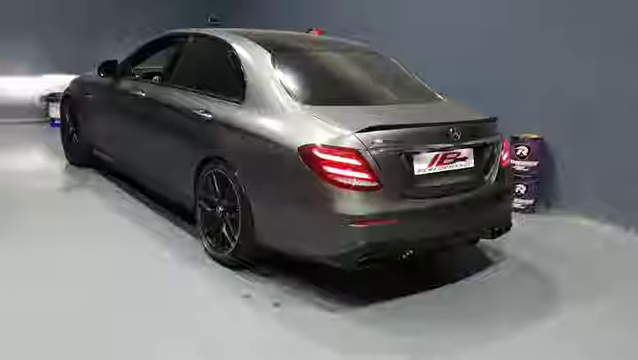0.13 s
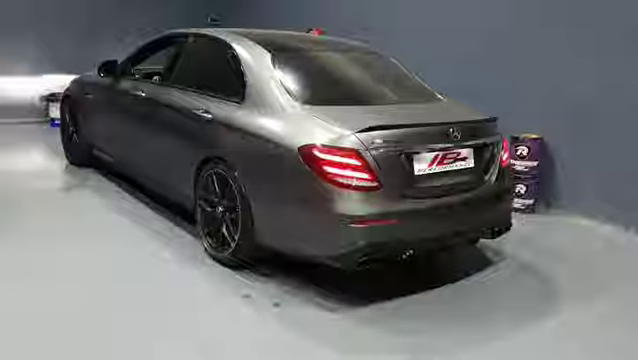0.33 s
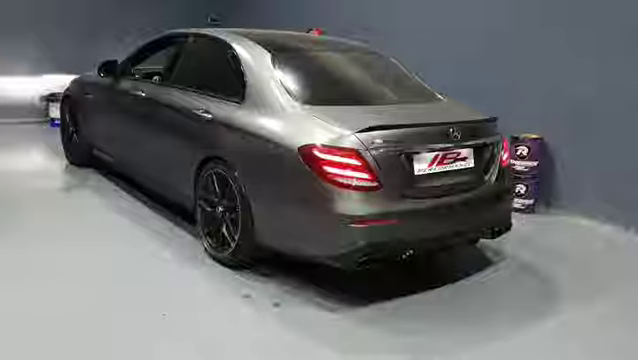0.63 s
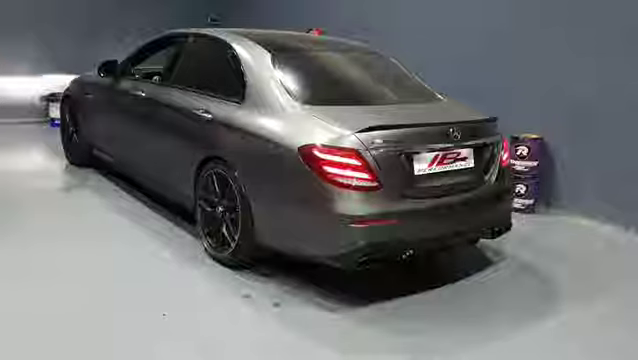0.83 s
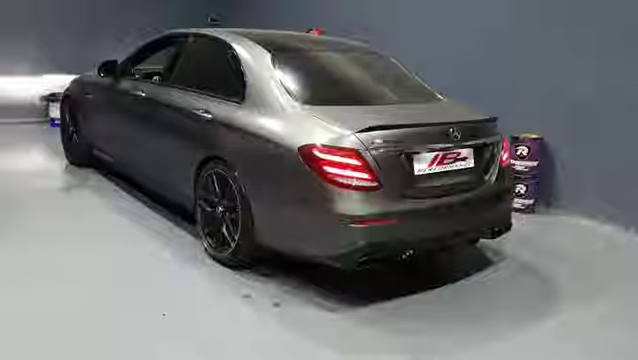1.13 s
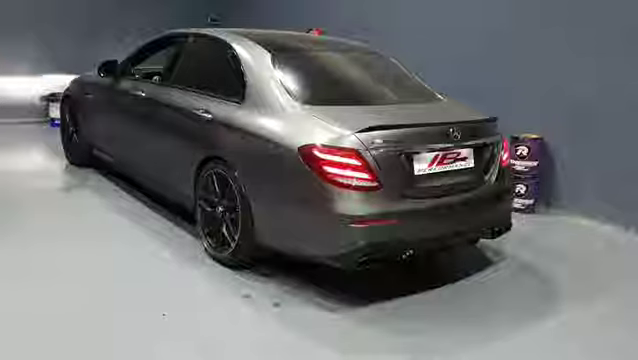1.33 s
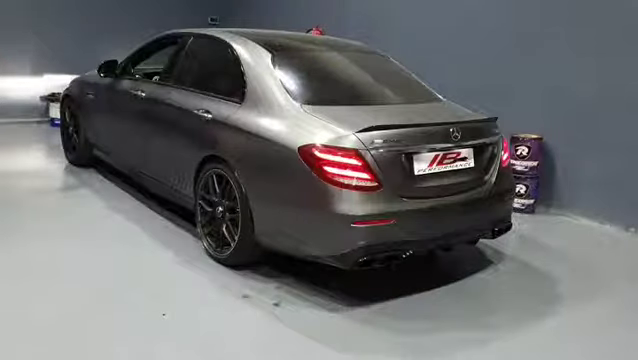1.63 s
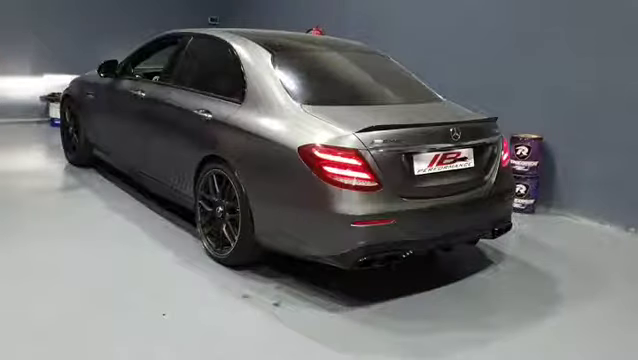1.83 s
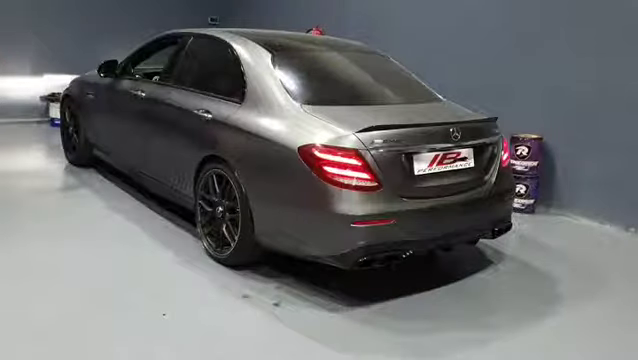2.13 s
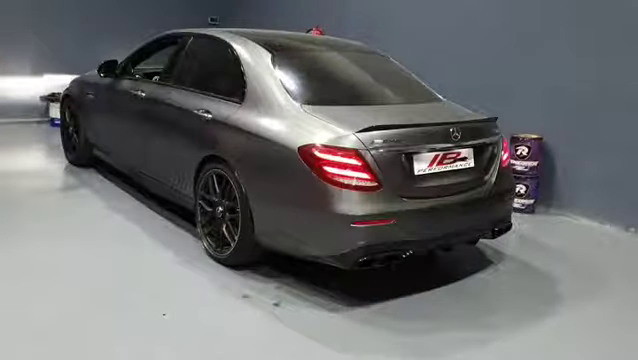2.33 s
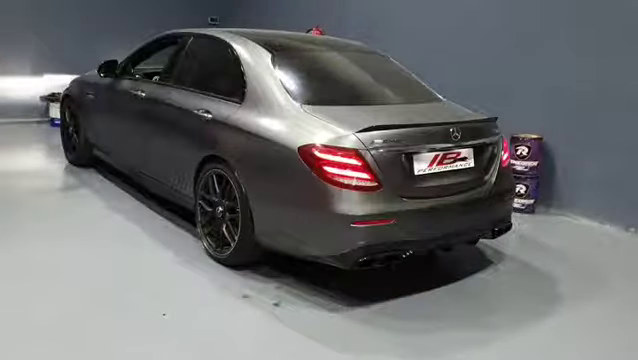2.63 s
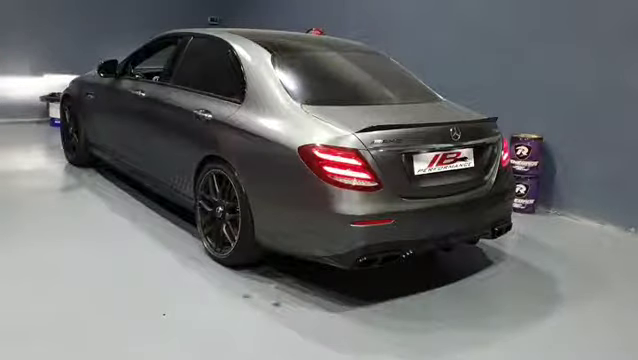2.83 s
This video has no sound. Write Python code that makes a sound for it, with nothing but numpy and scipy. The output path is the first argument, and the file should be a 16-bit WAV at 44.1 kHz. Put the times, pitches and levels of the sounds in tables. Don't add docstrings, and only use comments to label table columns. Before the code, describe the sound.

A car's eight-cylinder engine, heard from behind in a hard-walled garage. After brief silence it starts abruptly at 0.2 s, revs sinking to a soft, low idle by 1.2 s. Around 1.4 s the throttle opens with a thump and faint hiss; a raspy roar climbs to a peak near 1.9 s. From 2.1 to 2.5 s irregular pops crack and echo while the drone falls and fades. Small, slightly squashed microphone sound.

```python
import sys
import numpy as np
from scipy import signal
from scipy.fft import rfft, irfft, next_fast_len
from scipy.io import wavfile
from scipy.ndimage import uniform_filter1d, map_coordinates

SR = 44100
rng = np.random.default_rng(int(sys.argv[2]) if len(sys.argv) > 2 else 0)


def generate_wav(signal):
    frames = np.transpose(np.atleast_2d(signal))
    scaled = np.clip(frames, -1, 1) * 32767
    pcm = np.round(scaled).astype(np.int16)
    wavfile.write(sys.argv[1], SR, pcm)


def elevation(decibels):
    levels = np.asarray(decibels, float)
    return 10 ** (levels / 20)


N = 132300

# centre in Hz, width in Hz, level in dB.
ROOM_MODES = [(45, 8, 0), (60, 6, 6), (68.5, 5, 14), (80, 6, 8), (200, 10, 0), (321, 5, 0), (570, 8, 2)]
# centre in Hz, width in Hz, level in dB.
PIPE_MODES = [(327.3, 16.6, 3), (609, 75, 9.5), (893, 22, -15), (1142, 112, -11), (1480, 94, -12),
              (1604, 3.7, -17), (2654, 480, -15), (3500, 9.3, -12), (3590, 92, -11), (6360, 130, -28)]


def unit(x):
    return x / np.sqrt(np.mean(x ** 2) + 1e-20)


def along(points, hz):
    f, v = np.transpose(points)
    return np.interp(np.log(hz + 1), np.log(f + 1), v)


def curves(rows):
    s, *columns = np.transpose(rows)
    return [np.interp(np.arange(N) / SR, s, column) for column in columns]


def wobble(rate_hz):
    return map_coordinates(rng.standard_normal(400), [np.arange(N) * rate_hz / SR])


def filtered(x, response):
    m = next_fast_len(N + SR)
    return irfft(rfft(x, m) * response(np.fft.rfftfreq(m, 1 / SR)), m)[..., :N]


def ringing(peaks, f, flip=-1):
    total = 0
    for k, (centre, width, db) in enumerate(peaks):
        damping = 1j * f * abs(width)
        total = total + flip ** k * elevation(db) * damping / (centre * centre - f * f + damping)
    return total


def spread(pair, colour):
    # frequency in Hz, left-right likeness from 0 to 1.
    likeness = [(60, 1), (250, 0.96), (500, 0.87), (1000, 0.65), (2000, 0.47), (4000, 0.2), (8000, 0.16)]

    def mid_and_side(hz):
        turn = np.arccos(np.clip(along(likeness, hz), -1, 1)) / 2
        return colour(hz) * [np.cos(turn), np.sin(turn)]

    mid, side = filtered(pair, mid_and_side)
    return unit(np.array([mid + side, mid - side]))


def garage(x):
    # frequency in Hz, reverberation time t60 in seconds.
    decay_times = [(100, 0.98), (800, 0.21), (2000, 1.29), (5500, 1.6), (10000, 1.22), (14000, 0.31)]
    noise = rng.standard_normal((2, SR + SR // 2))
    hz, t, z = signal.stft(noise, SR, nperseg=256)
    decay = elevation(-60 * t / along(decay_times, hz)[:, None])
    tail = signal.istft(z * decay, SR, nperseg=256)[1]
    tail = np.pad(tail, ((0, 0), (400, N - 400 - tail.shape[1])))
    tail = spread(tail, np.ones_like) / np.sqrt(N)
    return signal.fftconvolve(x[None], tail, axes=1)[:, :N]


def intake():
    # start, attack, swell and release in seconds, level in dB.
    throttle_snap = (1.29, .025, .2, .27, -40)
    # frequency in Hz, level in dB per Hz.
    air_spectrum = [(6000, -30), (9500, -14), (10500, -24), (11400, 0), (13000, -1), (15400, -4),
                    (16000, -30)]
    start, attack, swell, release, db = throttle_snap
    opened = start + attack
    full = opened + swell
    gain, = curves([(start, 0), (opened, .11), (full, 1), (full + release, 0)])
    hiss = spread(rng.standard_normal((2, N)), lambda f: elevation(along(air_spectrum, f)))
    return elevation(db) * gain * hiss


def pops():
    # start in seconds, crack in dB, thud in dB, upper limit of the crack in Hz.
    pop_events = [(2.138, -10, -8, 3300), (2.184, -21.5, -2.5, 4140), (2.188, -10.5, -6, 4200),
                  (2.197, -22, -15, 4170), (2.212, -30, -6, 3970), (2.245, -4.5, -8, 3960),
                  (2.248, -2.5, -20, 4150), (2.2496, -15.5, -35, 18000), (2.259, -6.5, -10, 4000),
                  (2.261, -18, -30, 18000), (2.263, -12, -12, 4500), (2.274, -21, -13, 4200),
                  (2.356, -56, -5.5, 3000), (2.379, -1.5, -29, 15700), (2.387, -16, -24, 4500),
                  (2.398, -18, -37, 4500), (2.41, -35, -8, 4960), (2.435, -24, -28, 9000),
                  (2.462, -20.5, -16, 4520)]
    # frequency in Hz, level in dB per Hz.
    crack_spectrum = [(900, -26), (1500, -5), (1780, -15), (2300, -8), (3700, -5.5), (4670, -15),
                      (6200, -11.5), (10400, -24.5), (16000, -23.5)]
    # start in seconds, level in dB,
    # frequency in Hz, t60 in seconds.
    pressure_waves = [
        (1.405, -6.5, 65, 0.21),
        (1.476, -4.5, 67.6, 0.17),
        (2.067, -15.5, 73, 0.22),
        (2.176, -12, 70.6, 0.35),
        (2.2498, -6.5, 65.4, 0.21),
    ]
    cracks, thuds = np.zeros(N), np.zeros(N)
    t = np.arange(SR // 2) / SR
    crack_decay = elevation(-60 * t / 0.022) + 0.22 * elevation(-60 * t / 0.072)
    for s, crack_db, thud_db, top_hz in pop_events:
        burst = rng.standard_normal((2, len(t)))
        dull = signal.lfilter(*signal.butter(2, min(top_hz / SR * 2, .9)), burst[0])
        cracks[round(s * SR):][:len(t)] += elevation(crack_db) * crack_decay * dull
        thuds[round(s * SR):][:len(t)] += elevation(thud_db - 60 * t / 0.019) * burst[1]
    crack = elevation(7.5) * filtered(cracks, lambda f: elevation(along(crack_spectrum, f)) * (f > 900))
    thud = elevation(11.5) * filtered(thuds, lambda f: ringing(PIPE_MODES[:3], f) / (1 + (f / 1300) ** 4))
    walls = garage(elevation(1.3) * crack + elevation(-7.0) * thud)
    for s, db, hz, t60 in pressure_waves:
        onset = 1 - np.exp(-t / 0.0055)
        thud[round(s * SR):][:len(t)] += elevation(db - 60 * t / t60) * np.sin(2 * np.pi * hz * t) * onset
    return crack * elevation([[-2.5], [1.5]]) + thud + walls


def exhaust_gas(puff, share):
    return (1 - share + share * unit(puff)) * rng.standard_normal((2, N))


def pipe_gain(f):
    level_peaks = [(centre, width, 0) for centre, width, db in PIPE_MODES]
    return elevation(1.5) * np.abs(ringing(level_peaks, f)) + 1.06


def exhaust_rasp(puff, firing_hz, bright_db, fast):
    # frequency in Hz, level in dB per Hz.
    rasp_spectrum = [(900, -8.5), (1500, -4.5), (1850, -8), (2500, -7.5), (3700, -8), (4400, -17),
                     (6200, -16.5), (10400, -28.5), (11500, -31), (16000, -83)]
    # centre in Hz, width in Hz, level in dB.
    tip_modes = [(3340, 130, -2), (3570, 260, 0)]
    tips = spread(exhaust_gas(puff, 0.51), lambda f: ringing(tip_modes, f, flip=0.76) ** 2)[0]
    scream = elevation(3.5 + 1.66 * bright_db + wobble(70)) * np.sqrt(firing_hz / 320) * fast * tips
    edge = spread(exhaust_gas(puff, 0.071), lambda f: elevation(along(rasp_spectrum, f)) * pipe_gain(f))
    return scream * elevation([[-2.5], [2.5]]) + edge


def exhaust_roar(puff, fast):
    # frequency in Hz, level in dB per Hz.
    fast_spectrum = [(24, -37), (40, -3), (283, -2), (319, -2), (519, -4), (577, 0), (770, -7.5),
                     (1500, -19.5), (1950, -48), (3300, -120)]
    # frequency in Hz, level in dB per Hz.
    slow_spectrum = [(60, -38), (110, -2), (177, -2.5), (250, 0.5), (314, -7), (438, -7), (570, -8.5),
                     (786, -15.5), (1900, -37), (2600, -60)]
    # centre in Hz, width in Hz, level in dB.
    idle_modes = [(312, 9, 8), (398, 9, 6)]

    def fast_colour(f):
        room = np.abs(0.59 + 0.39 * ringing(ROOM_MODES, f))
        return elevation(along(fast_spectrum, f)) * pipe_gain(f) * room

    def slow_colour(f):
        hum = np.abs(1 + ringing(idle_modes, f, flip=0.8))
        return elevation(along(slow_spectrum, f)) * pipe_gain(f) * hum

    high = spread(exhaust_gas(puff, 0.37), fast_colour)
    low = spread(exhaust_gas(puff, 0.17), slow_colour)
    return np.sqrt(fast) * high + elevation(0.37) * np.sqrt(1 - fast) * low


def crank_drone(firing_hz, turns):
    # crank order (4 is the firing rate), level in dB.
    crank_orders = [(1, -22), (1.5, -16), (2, -25), (2.5, -3), (3, -6), (4, 0), (5, -6), (6, -6), (8, -9),
                    (12, -12)]
    # time in seconds, firing orders in dB, half orders of the uneven banks in dB.
    order_levels = [(.22, -21, -27), (.36, -22, -28), (.45, -22, -13.5), (.58, -23, -23), (.66, -24.5, -38),
                    (.76, -26, -25.5), (.86, -24.5, -36), (.91, -24, -42), (.97, -20.5, -46),
                    (1.09, -24, -52), (1.16, -35, -46), (1.21, -18.5, -24), (1.27, -27, -45),
                    (1.31, -40, -46), (1.45, -20, -24), (1.55, -15, -34), (1.8, -12, -19), (1.88, -15, -17),
                    (2.04, -16, -17), (2.1, -16, -32), (2.24, -19, -34), (2.33, -35, -20), (2.7, -29, -25),
                    (3, -60, -26.5)]
    whole_db, half_db = curves(order_levels)
    upper_db = 14 * np.log10(firing_hz / 250)
    tones = np.zeros(N)
    for j, (order, db) in enumerate(crank_orders):
        family_db = half_db if order % 1 else whole_db
        level_db = db + family_db + (order > 4) * upper_db + wobble(9.64)
        tones += elevation(level_db) * np.sin(2 * np.pi * order * turns + 3 * j)
    return filtered(tones, lambda f: .5 + ringing(ROOM_MODES, f, flip=0.86))


def engine():
    # time in seconds, firing rate in Hz.
    firing_rate = [(.2, 114), (.45, 109), (.6, 94), (.74, 80), (.85, 78), (.94, 71), (1.1, 68),
                   (1.19, 62.5), (1.36, 60), (1.42, 66), (1.55, 148), (1.7, 228), (1.8, 283), (1.88, 318),
                   (1.95, 321), (2.1, 319), (2.24, 312), (2.5, 258), (3, 230)]
    # time in seconds, exhaust roar in dB, throttle brightness in dB.
    engine_load = [(.22, -25.5, -5.5), (.38, -23, -7), (.6, -27, -8.5), (.9, -28, -11.5), (1.08, -33.5, -8),
                   (1.38, -33, -6), (1.44, -21.5, -2.5), (1.55, -11.5, -6.5), (1.7, -11.5, -5.5),
                   (1.8, -15.5, -4.5), (1.91, -13, -5), (1.98, -15.5, -8), (2.1, -19, -8.5),
                   (2.33, -18, -11.5), (2.5, -21.5, -16), (2.75, -26, -10), (3, -28, -8)]
    firing_hz, = curves(firing_rate)
    roar_db, bright_db = curves(engine_load)
    turns = np.cumsum(firing_hz / 4) / SR
    firings = 4 * turns
    size = elevation(6.6 * rng.standard_normal(900))[firings.astype(int)]
    puff = size * np.exp(-2.5 * (firings % 1))
    fast = np.clip((firing_hz - 70) / 90, 0, 1) * (np.arange(N) / SR > 1.35)
    drone = crank_drone(firing_hz, turns)
    roar = elevation(roar_db + 0.81 * wobble(15)) * exhaust_roar(puff, fast)
    rasp_gain = elevation(roar_db + bright_db + 0.96 * wobble(22.13))
    rasp = rasp_gain * exhaust_rasp(puff, firing_hz, bright_db, fast)
    return np.array([drone, np.roll(drone, shift=4)]) + roar + rasp


def scene():
    return intake() + pops() + engine()


def top_band(x):
    # frequency in Hz, start in seconds, end in seconds, level in dB.
    steady_whistles = [(10313, .2, 1.68, 2), (11063, .2, 2.15, 3), (11063, 2.19, 2.6, 3),
                       (11813, 1.6, 2.07, 5), (11813, 2.38, 2.65, 5), (12563, .2, 1.3, 3),
                       (12563, 1.86, 2.06, 0), (13313, .2, .65, 2), (13313, 1.62, 1.76, 2),
                       (13313, 1.79, 1.92, 1), (13313, 2.25, 2.345, 4), (13313, 2.38, 2.575, 3),
                       (14063, .2, .47, -2), (14063, 1.84, 1.91, -4)]
    tile_hz, bottom_hz = 750, 9750
    mask_db = -45.5
    whistle_growth, whistle_db = 1.3, -15
    hz, _, z = signal.stft(x, SR, nperseg=512)
    power = uniform_filter1d(np.abs(z[0] + z[1]) ** 2, size=5, axis=1)
    tile = np.maximum((hz - bottom_hz) // tile_hz + 1, 0).astype(int)
    first_bins = np.searchsorted(tile, np.arange(tile.max() + 1))
    share = np.add.reduceat(power, first_bins, axis=0) / (power.sum(0) + 1e-20)
    audible = (share > elevation(2 * mask_db))[tile]
    kept = signal.istft(z * audible, SR, nperseg=512)[1][:, :N]
    treble = filtered(x[0], lambda f: (f > 5000) * (f < 9000))
    treble_level = np.abs(uniform_filter1d(treble ** 2, size=1500)) ** (whistle_growth / 2)
    t = np.arange(N) / SR
    ear_phase = np.array([[0], [1.2]])
    tones = np.zeros((2, N))
    for f, start, end, db in steady_whistles:
        gate = uniform_filter1d(1. * (t > start) * (t < end), size=800)
        tones += elevation(db + whistle_db) * gate * np.sin(2 * np.pi * f * t + ear_phase)
    return kept + treble_level * tones * elevation([[-4], [1.5]])


def top_cut(x):
    return signal.sosfilt(signal.butter(12, 16540, fs=SR, output="sos"), x)


def record(dry):
    # frequency in Hz, left minus right in dB.
    port_balance = [(60, -1.3), (400, 0.1), (1300, 1), (2800, -2.5), (5500, -1.8), (10000, 2), (14000, -3)]
    start_s, ceiling = .2205, 0.9

    def ports(f):
        balance = elevation(along(port_balance, f) * np.array([[.5], [-.5]]))
        return balance / (1 + (33 / (f + 1)) ** 6)

    x = filtered(dry, ports)
    x = x / (1 + np.abs(x / ceiling) ** 4) ** (1 / 4)
    x = filtered(x, lambda f: (f < 15800) + .3 * (f >= 15800))
    mix = top_band(x) * (np.arange(N) / SR > start_s)
    return top_cut(mix)


dry = scene()
out = record(dry)
generate_wav(out)
```